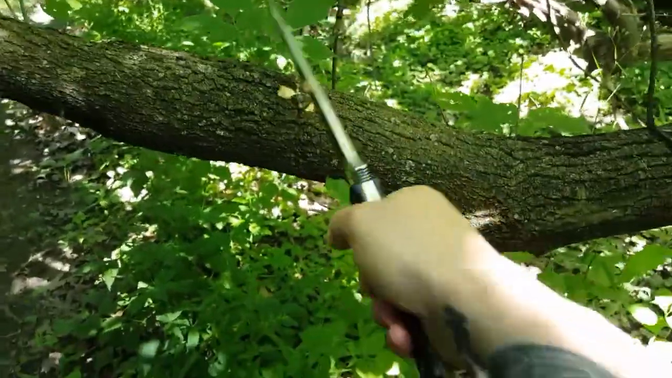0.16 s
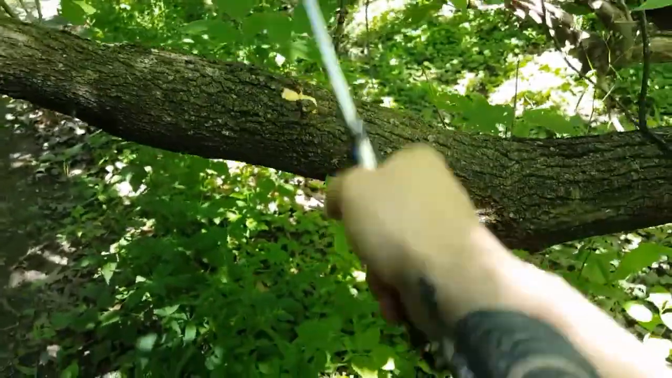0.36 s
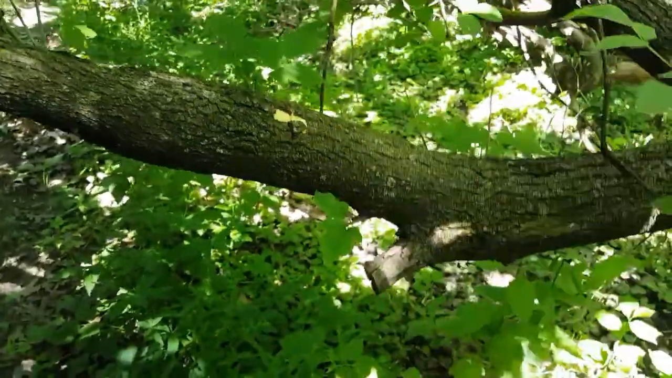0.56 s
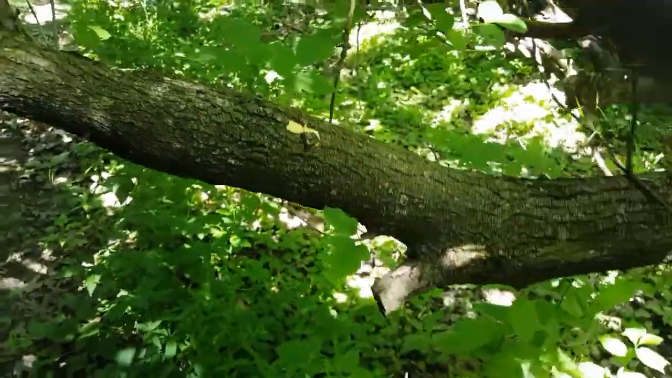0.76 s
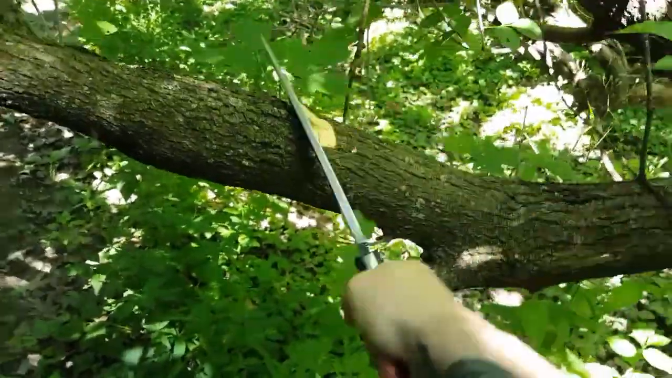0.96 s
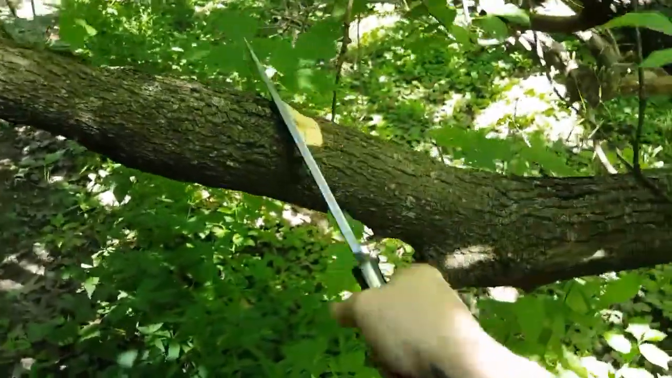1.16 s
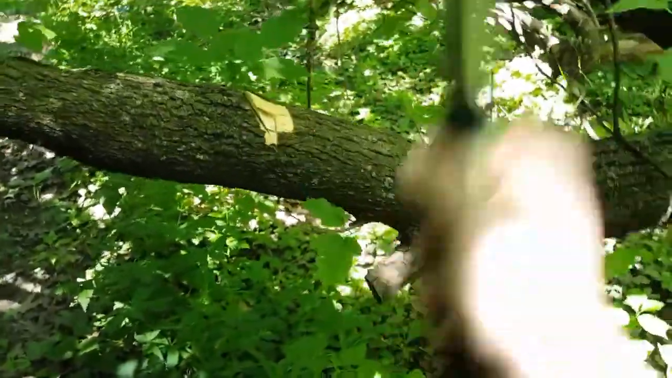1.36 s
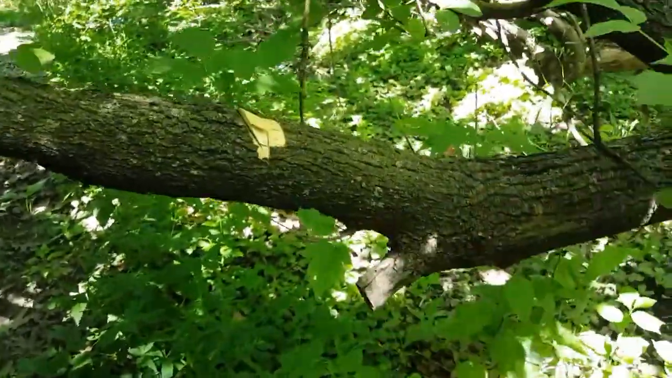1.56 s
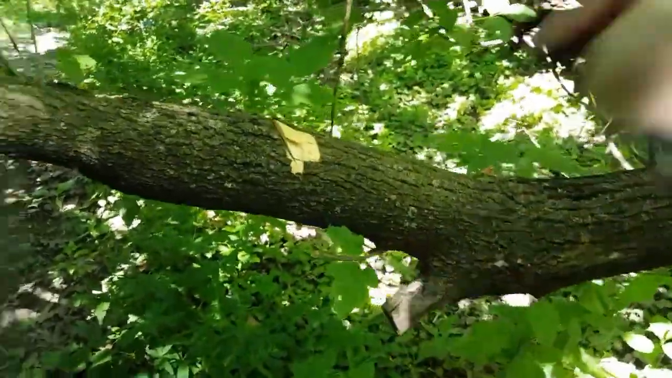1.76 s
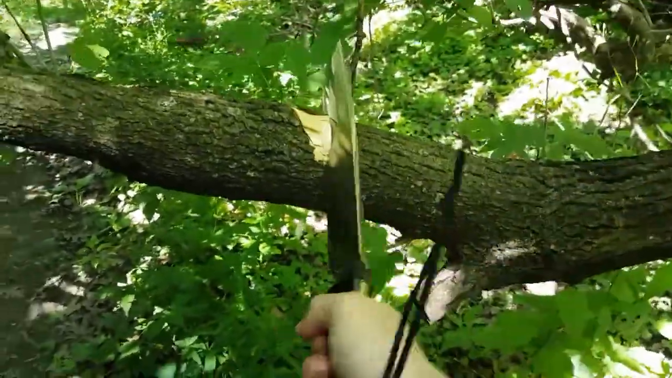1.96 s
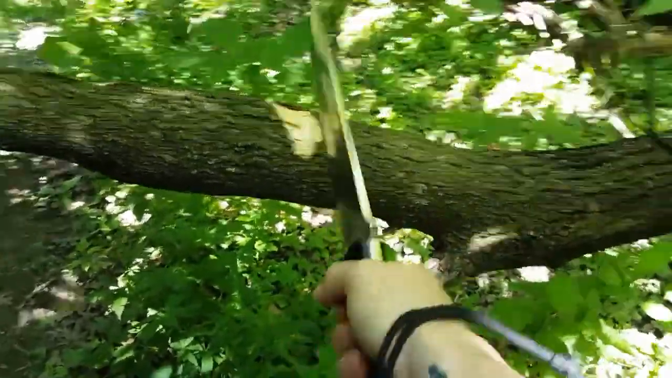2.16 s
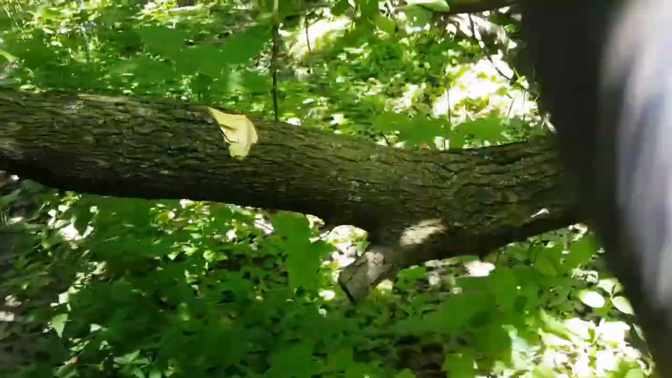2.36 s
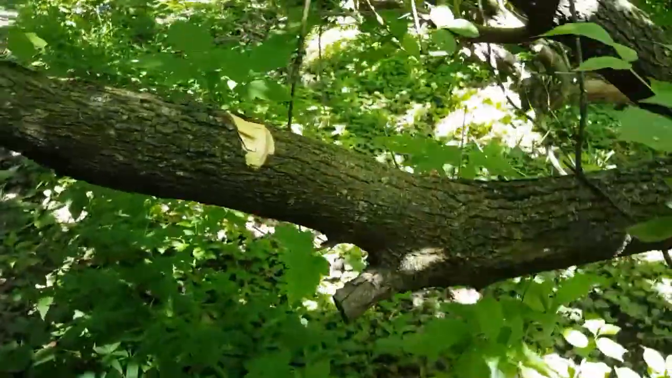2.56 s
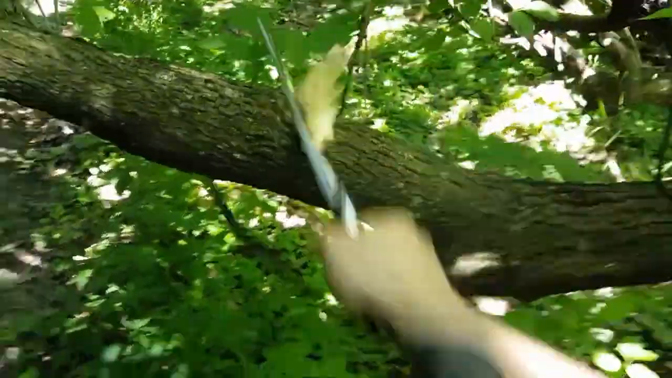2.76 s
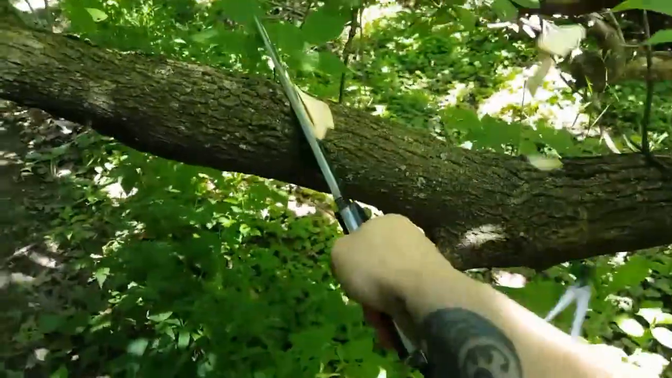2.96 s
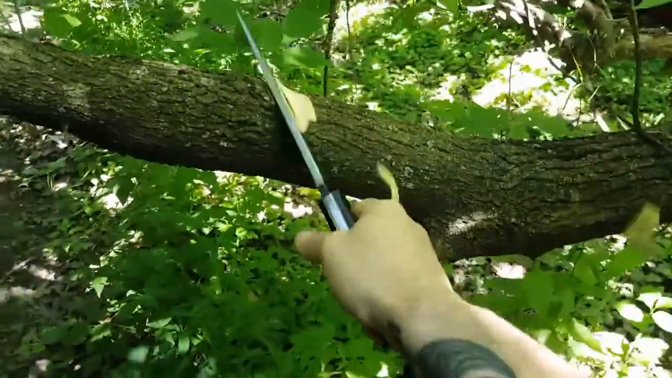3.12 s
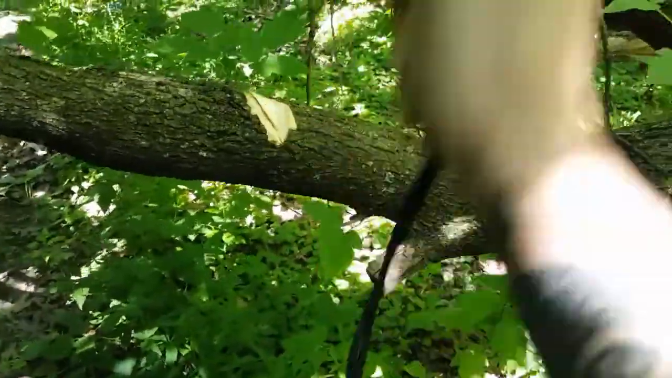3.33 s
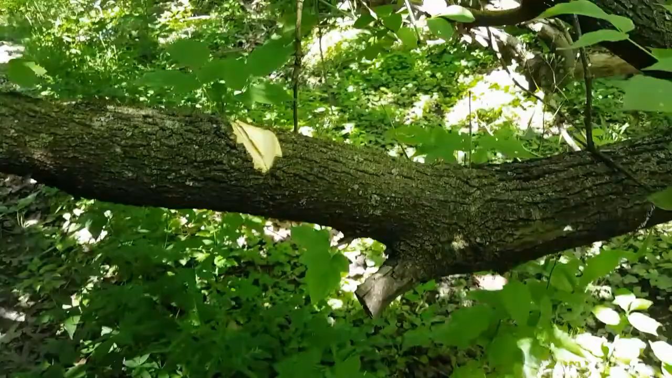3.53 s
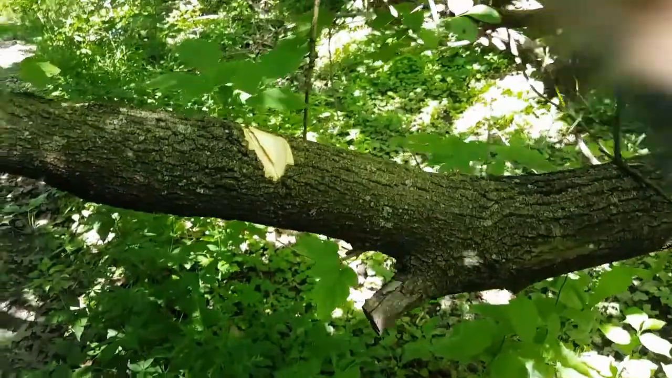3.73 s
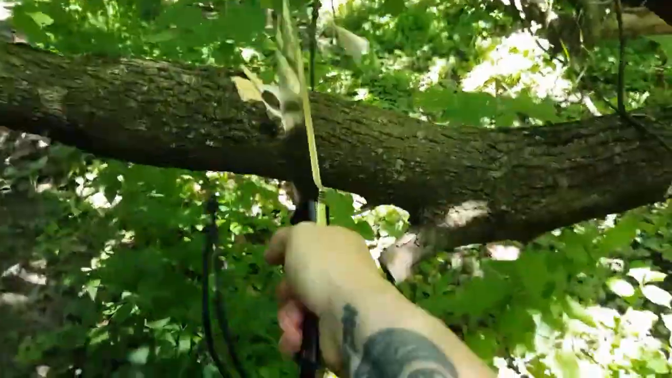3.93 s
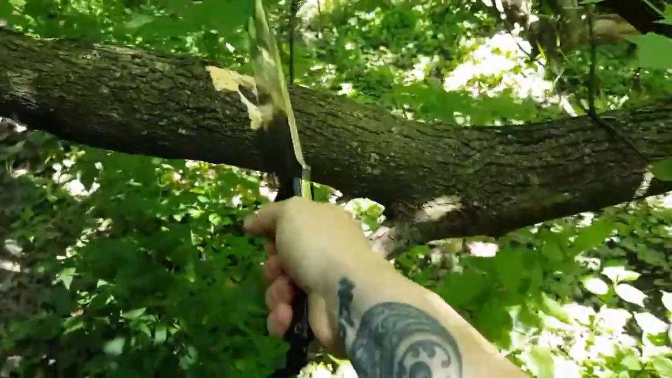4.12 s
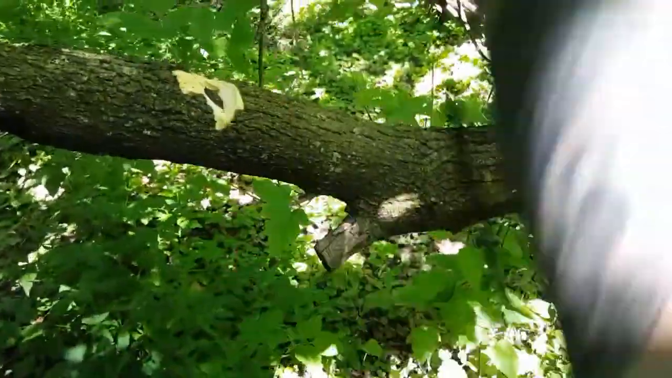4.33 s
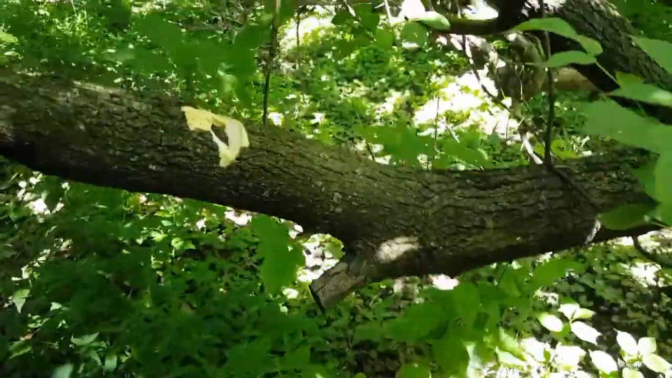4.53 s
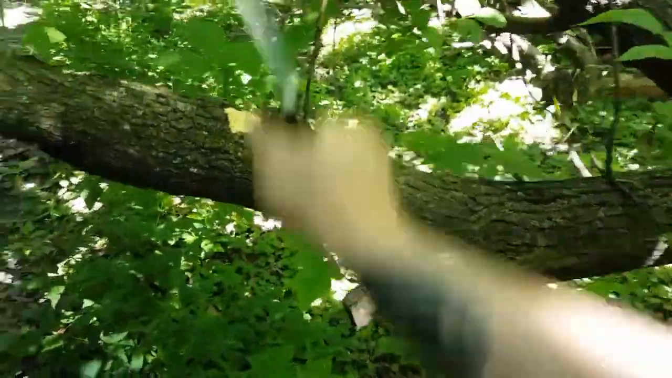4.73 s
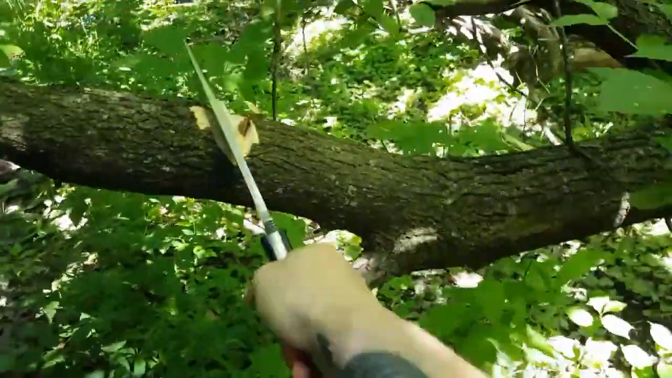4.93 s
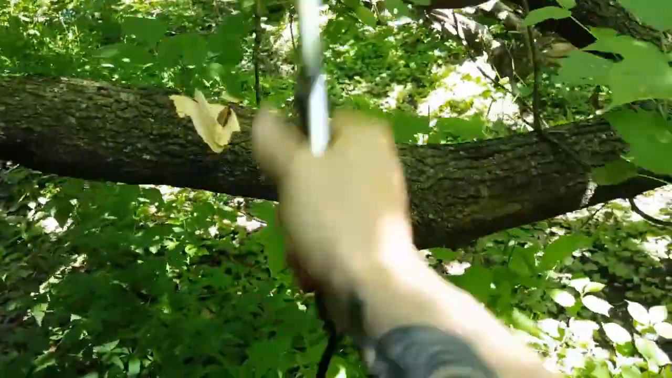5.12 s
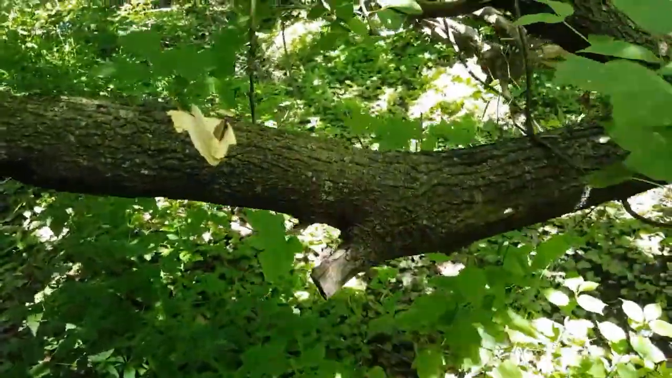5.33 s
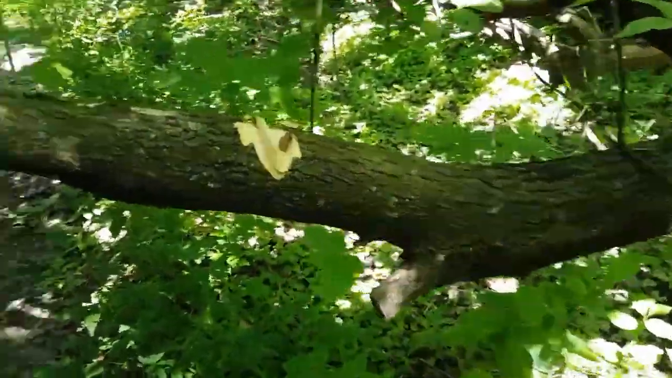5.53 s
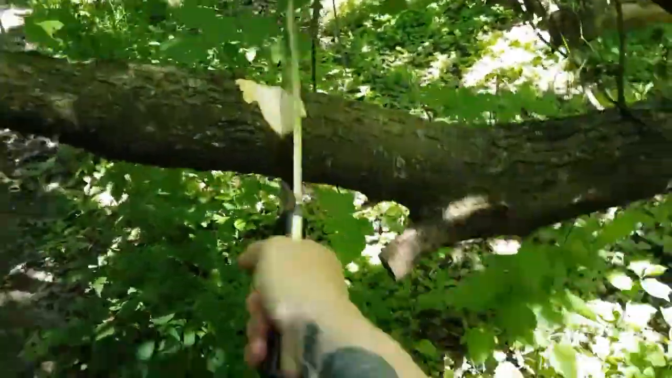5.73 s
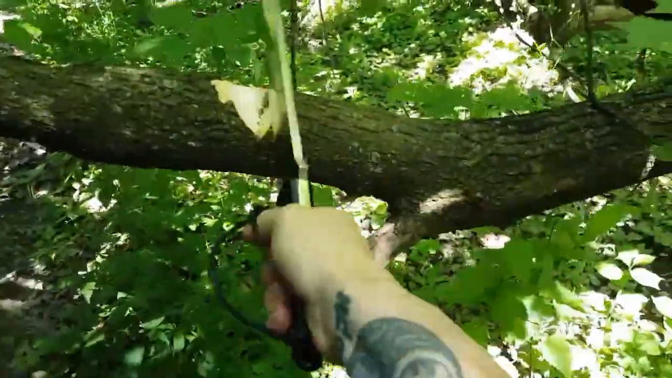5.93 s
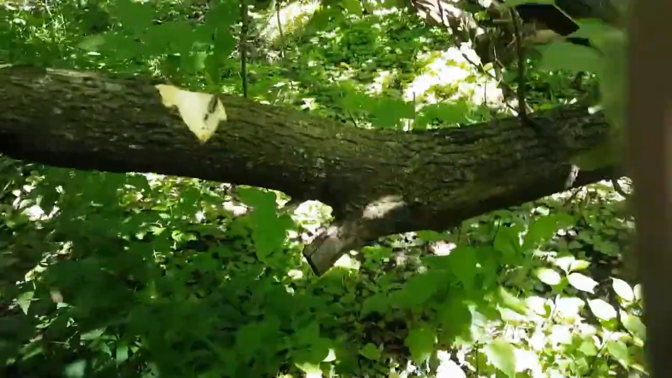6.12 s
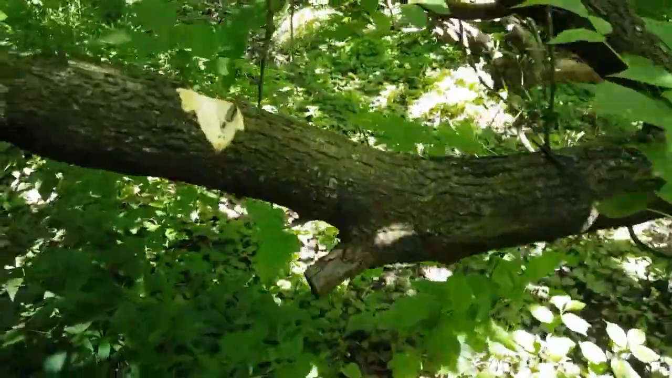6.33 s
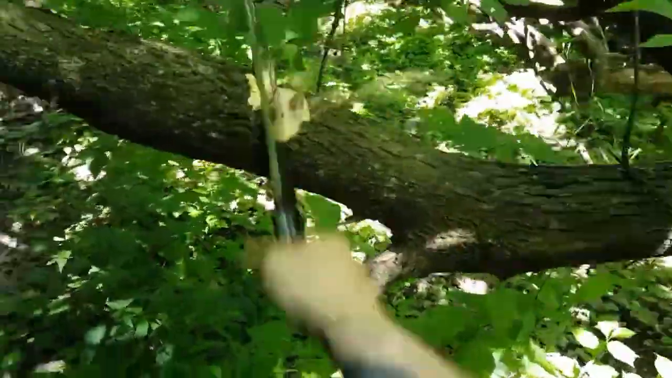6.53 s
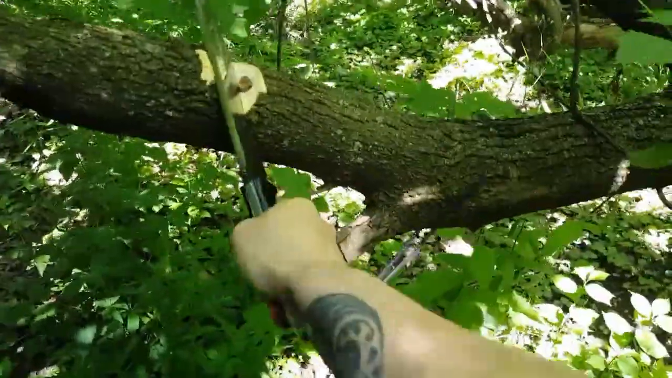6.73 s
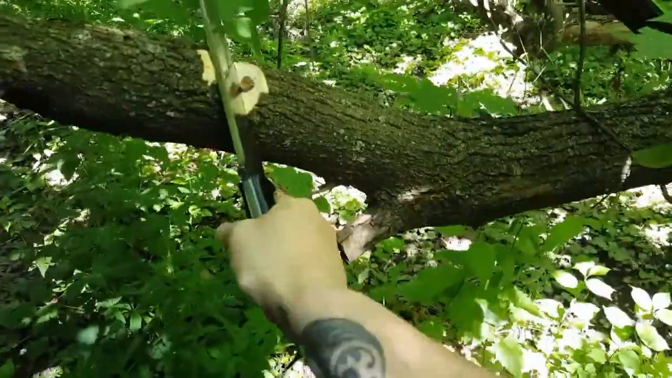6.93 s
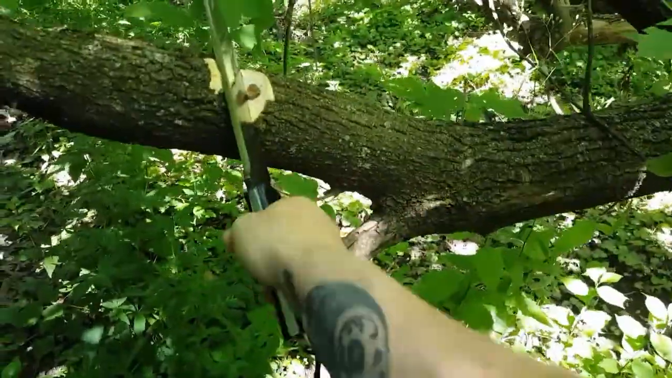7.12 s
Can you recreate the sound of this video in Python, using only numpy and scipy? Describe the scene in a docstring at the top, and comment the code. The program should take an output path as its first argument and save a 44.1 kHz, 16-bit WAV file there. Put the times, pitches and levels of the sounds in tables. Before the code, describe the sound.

Close, hard knife blows crack into solid wood roughly once a second, with small steel clinks, snapping chips, leaf rustle and distant bird pips.

```python
"""Chopping in a wood: a low hum, a thin whine, rumble, leaves and hiss (sines and filtered noise) lie behind.
The knife clinks now and then (damped steel modes) and chops seven times into a fallen branch, close by.
Each blow is a crack of splitting fibres (noise burst), the knock of the branch (modes), the answer of the trees.
Chips snap in the leaves (noise bursts); far birds call singly (gliding sines), later in a run of pips.
The recorder's gain control ducks at every blow, holds, and lets the background swell back."""
import sys
import numpy as np
from scipy.fft import rfft, irfft, next_fast_len
from scipy.io import wavfile
from scipy.ndimage import uniform_filter1d, minimum_filter1d, map_coordinates

SR = 44100
rng = np.random.default_rng(int(sys.argv[2]) if len(sys.argv) > 2 else 0)


def wav_out(sig):
    """Save sig, one row per channel (or a flat mono array), as 16-bit PCM at SR to the path in sys.argv[1]."""
    wavfile.write(sys.argv[1], SR, np.round(np.clip(np.atleast_2d(sig).T, -1, 1) * 32767).astype(np.int16))


N = 316638


def amp(db):
    """Level law: decibels to amplitude gain."""
    return 10 ** (np.asarray(db) / 20)


def unit(x):
    """Normalisation: x scaled to rms 1."""
    return x / np.sqrt(np.mean(x ** 2) + 1e-20)


def at_level(x, t, start, end, db):
    """Short-time level: x scaled so that its rms between start and end is db."""
    window = (t >= start) & (t < end)
    return x * amp(db) / np.sqrt(np.mean(x[:, window] ** 2) + 1e-20)


def pan(db):
    """Level difference between channels: left and right gains, db apart."""
    return amp([[db / 2], [-db / 2]])


def along(points, hz):
    """Spectral envelope: (f, value) points interpolated over log frequency."""
    f, v = np.transpose(points)
    return np.interp(np.log(hz + 1), np.log(f + 1), v)


def curves(rows):
    """Slow variation: each column after the time, interpolated to one value per sample."""
    s, *cols = np.transpose(rows)
    return [np.interp(np.arange(N) / SR, s, c) for c in cols]


def wobble(rate, size=32):
    """Random modulation: a smooth curve, rate knots a second, worked out every size samples."""
    at = np.arange(0, N + size, size)
    knots = rng.standard_normal(int(N * rate / SR) + 4)
    return np.interp(np.arange(N), at, map_coordinates(knots, [at * rate / SR]))


def coloured(x, gain_db):
    """Minimum-phase filtering: x through the causal filter whose gain is gain_db(f)."""
    m = 2 * next_fast_len(x.shape[-1] // 2 + 4096)
    cepstrum = irfft(np.log(amp(gain_db(np.fft.rfftfreq(m, 1 / SR))) + 1e-6))
    # folding the cepstrum onto positive times makes the response causal
    cepstrum[1:m // 2] *= 2
    cepstrum[m // 2 + 1:] = 0
    return irfft(rfft(x, m) * np.exp(rfft(cepstrum)), m)[..., :x.shape[-1]]


def bump(hz, centre_hz, width, db):
    """Resonance curve in dB; width is a share of its centre frequency."""
    return db / (1 + ((hz / centre_hz - 1) / width) ** 2)


def tilt(hz, body_db, treble_db):
    """Spectral balance: gain in dB of the hollow low range and of the treble."""
    body = body_db / (1 + (np.log2((hz + 1) / 400) / 0.91) ** 4)
    return body + treble_db / (1 + (3400 / (hz + 1)) ** 4)


def ripple(hz, spacing_hz, db):
    """Modal irregularity: random narrow resonances and notches, new at each call, deeper in the treble."""
    knots = np.clip(rng.standard_normal(int(SR / spacing_hz) + 4), -1.5, 1.5)
    return db * map_coordinates(knots, [hz / spacing_hz]) * hz / (hz + 1500)


def noise(size, split_hz):
    """Interchannel coherence: stereo noise, alike in both channels well below split_hz, unrelated well above."""
    mid, side = rfft(rng.standard_normal((2, size)))
    turn = np.pi / 4 / (1 + (split_hz / (np.fft.rfftfreq(size, 1 / SR) + 1)) ** 2)
    mid, side = mid * np.cos(turn), side * np.sin(turn)
    return irfft(np.array([mid + side, mid - side]), size)


def burst(envelope, split_hz):
    """Broadband transient: a dense run of impulses under an envelope, evenly spread in frequency."""
    x = noise(len(envelope), split_hz) * envelope
    for _ in range(3):
        z = rfft(x)
        flat = irfft(z / (abs(z) + 1e-9), len(envelope))
        x = flat * np.sqrt(envelope)
    return x


def ring(modes, t, scatter_db, spread):
    """Modal decay: damped modes at new strengths, the high ones differing in phase between the channels."""
    hz, db, t60 = np.transpose(modes)[:, :, None]
    db = db + scatter_db * rng.standard_normal(hz.shape)
    phase = rng.uniform(0, 2 * np.pi, hz.shape)
    phase = phase + np.minimum(spread * hz / 1000, 2) * rng.standard_normal((2,) + hz.shape)
    return np.sum(amp(db - 60 * t / t60) * np.sin(2 * np.pi * hz * t + phase), axis=1)


def add(track, s, x):
    """Superposition: mix x into the track at time s."""
    i = min(max(round(s * SR), 0), N)
    track[:, i:i + x.shape[1]] += x[:, :N - i]


# low wavering hum and high whine drifting: t/s, whine gain/dB, hum gain/dB
DRONE_DRIFT = [(0, 9, -54.5), (.85, 11.5, -51.5), (1.6, 12, -63.5), (2.9, 6.5, -56.5), (4.4, 2, -67),
               (5.3, -10, -67.5), (7.18, -8, -63.5)]
# partials of the whine: f/Hz, relative level/dB
WHINE_PARTIALS = [(5389, -83), (5792, -81), (6191, -79.5), (6589, -78.5), (6988, -74.5), (7391, -80.5),
                  (7590, -78), (7994, -82.5), (8193, -75.5), (8586, -80), (8985, -81.5), (9388, -81.5)]
# narrow noise band around the whine: f/Hz, relative level/dB
SHIMMER_SPECTRUM = [(4500, -40), (5800, -9), (7000, 0), (8300, -1), (9300, -14), (10500, -45)]


def drone():
    """Modulated partials: a low wavering hum, and a thin whine of flickering sines in a narrow shimmer."""
    t = np.arange(N) / SR
    whine_db, hum_db = curves(DRONE_DRIFT)
    whine = np.zeros((2, N))
    for hz, db in WHINE_PARTIALS:
        phase = 1.5 * wobble(45) + rng.uniform(0, 2 * np.pi, (2, 1))
        whine += amp(db - 1 + 4 * wobble(9)) * np.sin(2 * np.pi * hz * t + phase)
    band = unit(coloured(noise(N, split_hz=3000), lambda hz: along(SHIMMER_SPECTRUM, hz)))
    shimmer = amp(-77 + 1.5 * wobble(40)) * band
    hum = amp(-1.0 + 1.6 * wobble(6.7)) * np.sin(2 * np.pi * 107 * t + .7 * wobble(10))
    return amp(whine_db) * (whine + shimmer) + amp(hum_db) * hum


# the wood at rest, before the gain control
RUMBLE_DB, LEAVES_DB, HISS_DB = -57.5, -59, -65
# air and clothing stir on every downswing, centred shortly before the blow
SWING_LEAD_S, SWING_S, SWING_RUMBLE_DB, SWING_RUSTLE_DB = 0.034, 0.062, -56, -57
# the body shifts between blows: t/s, half length/s, rumble level/dB, rustle level/dB, hiss level/dB
BODY_SHIFTS = [(0.659, .2, -58, -63.5, -73), (1.55, .25, -61.5, -58, -59.5), (3.677, 0.17, -66.5, -65, -63),
               (4.557, .17, -43.5, -52, -52.5), (7.14, 0.25, -48, -57, -86)]
# foliage shakes after a blow and settles: t/s, leaves level/dB, hiss level/dB, settling/(dB/s)
FOLIAGE_SHAKES = [(3.9, -36, -46, 17.5), (6.62, -41.5, -47.5, 22)]
SHAKE_RISE_S = 0.059


def stir():
    """Addition of powers: gains of rumble, leaves, hiss from rest, swings, body shifts and shaken foliage."""
    t = np.arange(N) / SR
    swell = lambda s, half_length: np.exp(-((t - s) / half_length) ** 2)
    power = lambda levels_db: amp(levels_db)[:, None] ** 2
    total = power([RUMBLE_DB, LEAVES_DB, HISS_DB]) * np.ones(N)
    swings = sum(swell(blow[0] - SWING_LEAD_S, SWING_S) for blow in BLOWS)
    total[:2] += power([SWING_RUMBLE_DB, SWING_RUSTLE_DB]) * swings
    for s, half_length, *levels_db in BODY_SHIFTS:
        total += power(levels_db) * swell(s, half_length)
    for s, leaves_db, hiss_db, settling in FOLIAGE_SHAKES:
        age = np.maximum(t - s, 0)
        shake = (1 - np.exp(-age / SHAKE_RISE_S)) * amp(-settling * age)
        total[1:] += power([leaves_db, hiss_db]) * shake ** 2
    return np.sqrt(total)


# dry snap, shared by leaves, chips, splinters and the knife's tick: f/Hz, relative level/dB
SNAP_SPECTRUM = [(100, -14.5), (500, -5), (1300, -5.5), (2300, -2.5), (3500, -3.5), (5000, -7.5),
                 (8000, -2), (14500, -13)]


def tick(pitch):
    """Resonant impulse: one tiny snap of peak 1; pitch runs from 0 (dull) to 1 (bright)."""
    t = np.arange(2 ** 11) / SR
    ring_hz = 700 * 6 ** pitch
    colour = lambda hz: along(SNAP_SPECTRUM, hz) + tilt(hz, 0, -8) + bump(hz, ring_hz, width=0.042, db=14.5)
    x = coloured(noise(len(t), split_hz=770) * amp(-60 * t / 0.016), colour)
    return x / abs(x).max()


def rustle(per_second, db, count=12):
    """Random impulse process: ticks at random times and strengths from a handful of dry leaves."""
    out = np.zeros((2, N))
    leaves = [tick(pitch) for pitch in np.linspace(0, 1, count)]
    for when, size, which in rng.uniform(size=(int(per_second * N / SR), 3)):
        add(out, when * N / SR, amp(db - 14 * (1 - size ** 2)) * leaves[int(which * count)])
    return out


# low rumble of the wood: f/Hz, relative level/dB
RUMBLE_SPECTRUM = [(12, -49.5), (20, -16.5), (27, -17), (48, -10.5), (102, 0.5), (117, -1.5), (145, -8.5),
                   (300, -16.5), (390, -47), (660, -120)]
# stirring leaves: f/Hz, relative level/dB
LEAVES_SPECTRUM = [(120, -30.5), (200, -8.5), (296, -6.5), (369, -0.5), (545, -10), (597, -6), (918, -7),
                   (1240, -11.5), (2320, -7.5), (4500, -18), (5850, -52), (9900, -120)]
# fine hiss: f/Hz, relative level/dB
HISS_SPECTRUM = [(2350, -31), (4000, -6), (5020, -5), (5220, -4.5), (5860, -4), (7150, -2), (8300, -0.5),
                 (10000, -10.5), (14000, -7.5), (14800, -14.5), (15000, -16.5)]
RUMBLE_PAN_DB, LEAVES_PAN_DB, HISS_PAN_DB = 1, -1.3, 0.35


def forest():
    """Filtered random noise: low rumble, stirring leaves with their dry ticks, and a fine hiss."""
    rumble_gain, leaves_gain, hiss_gain = stir()
    rush = lambda spectrum, split_hz: unit(coloured(noise(N, split_hz), lambda hz: along(spectrum, hz)))
    rumble = amp(1.3 * wobble(16)) * rush(RUMBLE_SPECTRUM, split_hz=230)
    leaves = amp(.8 * wobble(25)) * rush(LEAVES_SPECTRUM, split_hz=620) + rustle(per_second=12, db=17)
    hiss = amp(.8 * wobble(65)) * rush(HISS_SPECTRUM, split_hz=3500)
    return (rumble_gain * pan(RUMBLE_PAN_DB) * rumble
            + leaves_gain * pan(LEAVES_PAN_DB) * leaves
            + hiss_gain * pan(HISS_PAN_DB) * hiss)


def pip(db, pitch_hz, length, rise=.07):
    """Frequency glide: one short note, rising by a share of its pitch."""
    progress = np.linspace(0, 1, int(max(length, .005) * SR))
    hz = pitch_hz * (1 + rise * (progress - .5))
    phase = 2 * np.pi * np.cumsum(hz) / SR + rng.uniform(0, 1, (2, 1))
    return amp(db) * np.sin(np.pi * progress) ** 2 * np.sin(phase)


# single far calls: t/s, level/dB, f/Hz, length/s
SINGLE_CALLS = [(2.275, -59.5, 2956, .04), (2.28, -58, 2330, .06), (2.341, -51.5, 1040, 0.054)]
# a far bird repeats one pip, slowing a little
PIP_START_S, PIP_GAP_S, PIP_SLOWING_S, PIP_HZ, PIP_S = 5.118, 0.17, 0.00045, 2360, 0.027
# strength of the pips: t/s, level/dB
PIP_STRENGTH = [(5.1, -53), (6.2, -59), (6.8, -44.5), (7.18, -48)]


def birds(count):
    """Tonal calls in near-periodic repetition: a few single calls, then a run of pips, from far away."""
    out = np.zeros((2, N))
    for s, db, pitch_hz, length in SINGLE_CALLS:
        add(out, s, pip(db, pitch_hz, length))
    for k in range(count):
        s = PIP_START_S + k * (PIP_GAP_S + k * PIP_SLOWING_S)
        add(out, s, pip(np.interp(s, *np.transpose(PIP_STRENGTH)), PIP_HZ, PIP_S))
    return out


# bark, chips and twigs snap; the row at 3.888 s is a soft, dull noise just ahead of the fourth blow:
# t/s, peak level/dB, treble gain/dB, envelope t60/s, ring f/Hz
CHIP_SNAPS = [(0.093, -36.5, 8, 0.0185, 2500), (.752, -40, -8, .04, 2570), (1.013, -16.5, -13, 0.034, 2600),
              (1.064, -20, -6.5, 0.022, 2420), (1.309, -33, -15, 0.16, 1588),
              (1.354, -28, -10, 0.028, 2050), (1.582, -24, 0.5, 0.095, 1724), (1.921, -2, -8, 0.019, 1500),
              (2.9617, -.5, -8.5, 0.012, 1460), (3.553, -24, -0.5, 0.2, 5880),
              (3.635, -31, -9.5, 0.0507, 2250), (3.888, -10, -23, 0.12, 1030),
              (4.231, -22.5, -19, 0.025, 2490), (4.463, -22.5, -4, 0.033, 1870),
              (4.529, -19.5, -13.5, 0.033, 3480), (4.681, -30, -36, .04, 1066),
              (4.727, -26, -18, 0.048, 2570), (4.958, -21, -2, .025, 1700), (5.679, -34, -10, 0.0223, 2003),
              (6.161, -36.5, -19.5, 0.0292, 2401), (6.26, -36.5, -10, 0.043, 2304),
              (6.44, -38, -27, 0.029, 996), (6.888, -32, -35, 0.11, 400), (6.919, -29, -1, 0.022, 2270)]


def chips():
    """Brittle fracture: dry snaps with short rings and faint scatter from foliage, and one soft, dull noise."""
    out, t = np.zeros((2, N)), np.arange(2 ** 13) / SR
    for s, db, treble_db, t60, ring_hz in CHIP_SNAPS:
        envelope = amp(-60 * t / t60) + amp(-38.5) * amp(-60 * t / .15)
        ring_db = 12 * min(1, t60 / .035)  # the shortest sounds ring less
        colour = lambda hz: (along(SNAP_SPECTRUM, hz) + tilt(hz, 0, treble_db)
                             + bump(hz, ring_hz, width=0.057, db=ring_db))
        snap = coloured(burst(envelope, split_hz=2100), colour)
        add(out, s, amp(db) * snap / abs(snap).max())
    return out


# the knife clinks in the hand: t/s, peak level/dB, two favoured rings f/Hz, tick over ring level/dB
KNIFE_CLINKS = [(0.2871, -19, 1152, 4160, 4), (.8998, -20, 3130, 3700, 3), (1.886, -18, 3147, 4720, 3),
                (4.7847, -21, 3700, 6800, 2)]
# modes of the steel: f/Hz, relative level/dB, t60/s
STEEL_MODES = [(1150, -27, .14), (2040, -5.5, .02), (3144, -18, .06), (3790, -7, .02), (4160, -15, .05),
               (4670, -15, 0.036), (6089, -14.5, .05), (6860, -10, .035), (7860, -14, .05)]


def clinks():
    """Modal excitation: a tick and a short ring of steel; the contact point favours two modes."""
    out, t = np.zeros((2, N)), np.arange(2 ** 13) / SR
    for s, db, *rings_hz, tick_db in KNIFE_CLINKS:
        favour = lambda hz: sum(bump(hz, ring_hz, width=.04, db=15) for ring_hz in rings_hz)
        modes = [(hz, level + favour(hz), t60) for hz, level, t60 in STEEL_MODES]
        contact = coloured(burst(amp(-60 * t / 0.047), split_hz=560), lambda hz: along(SNAP_SPECTRUM, hz))
        clink = unit(ring(modes, t, scatter_db=0.56, spread=.5)) + amp(tick_db) * unit(contact)
        clink = clink * (1 - np.exp(-t / .0006))
        add(out, s, amp(db) * clink / abs(clink).max())
    return out


# answer of the trees: f/Hz, relative level/dB
ECHO_SPECTRUM = [(30, -17.5), (90, -11.5), (200, -0.5), (330, 0.5), (520, 1.5), (750, -2), (2700, -6.5),
                 (4500, -13.5), (8000, -14), (10000, -19), (14500, -25.5)]


def echo(t, treble_db):
    """Multiple scattering: near foliage answers at once in uneven clumps, far trunks go on faintly."""
    decay = amp(-60 * t / .27) + amp(-24.5) * amp(-60 * t / 0.78)
    scatter = (1 - np.exp(-(t / 0.021) ** 2)) * decay
    clumps = amp(1.1 * wobble(200)[:len(t)])
    colour = lambda hz: along(ECHO_SPECTRUM, hz) + tilt(hz, 0, treble_db) + ripple(hz, spacing_hz=109.7, db=2)
    return coloured(noise(len(t), split_hz=240) * scatter * clumps, colour)


# modes of the branch: f/Hz, relative level/dB, t60/s
BRANCH_MODES = [(63, -18, 0.16), (164.5, -5, 0.13), (190, -11, 0.13), (284, -13.5, 0.15),
                (406.4, -4.5, .11), (492, -9.5, 0.12), (551, -6.5, 0.13), (761.5, -6, 0.094),
                (874, -8.5, 0.11), (1009.2, -5.5, 0.094), (1135, -11.5, 0.14), (1370, -12.5, .08),
                (1615, -18.5, .08), (1810, -14, .09), (1950, -14.5, 0.1), (2420, -15, .1),
                (2760, -16, 0.16)]
# noisy part of the knock: f/Hz, relative level/dB
KNOCK_SPECTRUM = [(25, -14), (60, -11.5), (105, -15.5), (170, -3.5), (400, 2), (950, -2), (1400, -8),
                  (2600, -11.5), (4200, -17), (8000, -18), (10000, -26.5), (14500, -26)]


def knock(t, delay, branch_hz, body_db, treble_db):
    """Bending waves: the knock swells as the wave runs along the branch, then its modes ring out."""
    swell = 1 / (1 + np.exp(-(t - delay) / .005))
    fade = amp(-60 * np.maximum(t - .022, 0) / 0.081)
    colour = lambda hz: (along(KNOCK_SPECTRUM, hz) + bump(hz, branch_hz, width=0.063, db=10.0)
                         + ripple(hz, spacing_hz=114.5, db=4))
    wood = coloured(burst(swell * fade, split_hz=480), colour)
    modes = ring(BRANCH_MODES, t, scatter_db=2.5, spread=2.1) * (1 - np.exp(-t / 0.02))
    return coloured(unit(wood) + amp(-1.5) * unit(modes), lambda hz: tilt(hz, body_db, treble_db))


# splitting fibres: f/Hz, relative level/dB
CRACK_SPECTRUM = [(25, -12.5), (70, -2.5), (250, -3), (500, -7), (1000, -1), (1700, -3), (2800, -4),
                  (3600, -11), (5500, -13.5), (7500, -9.5), (9500, -18.5), (14500, -20.5)]


def crack(t, bite, cut_modes, body_db, treble_db, thump_db):
    """Fracture noise: fibres split until the wood stops the blade; the cut rings briefly."""
    stop = amp(-60 * np.maximum(t - bite, 0) / 0.019)
    fibres = burst((1 - np.exp(-t / 0.00074)) * stop, split_hz=440)

    def colour(hz):
        """Resonance of the cut over the balance of the blow."""
        cut = sum(bump(hz, centre_hz, width=0.13, db=8) for centre_hz in cut_modes)
        thump = thump_db / (1 + (hz / 200) ** 4)
        balance = along(CRACK_SPECTRUM, hz) + tilt(hz, body_db, treble_db)
        return balance + thump + cut + ripple(hz, spacing_hz=252.6, db=2.5)
    return coloured(fibres, colour)


# blows, levels before the low shelves: t/s, bite length/s, crack level/dB, crack body gain/dB,
# crack treble gain/dB, thump gain/dB, three resonances of the cut f/Hz, knock level/dB, knock body gain/dB,
# knock treble gain/dB, knock delay/s, branch resonance f/Hz, echo level/dB, deep bass gain/dB, pan/dB
BLOWS = [(0.9458, 0.00388, -0.5, -1.5, 3.5, 2.5, 975.6, 2450, 3910, -14.5, -0.5, 3.5, .011, 820, -32.5, -6, 0.5),
         (1.926, 0.0049, 5.5, -2.5, 5, 3.5, 1024, 1467, 2462, -7.5, -0.5, 3.5, .006, 470, -33, 2, 1.33),
         (2.856, 0.0051, -6, 3, 4, 2, 1000, 1630, 2500, -22, 3, -1.5, .008, 894, -35.5, -3, 3.3),
         (3.894, .0065, 1, -3, -5.5, -9, 810, 1850, 2700, -3.5, -2.5, -6, .013, 407, -18, -14, -1.2),
         (4.8468, 0.0036, 3, 6, 4.5, -3, 432.7, 2216, 2960, -12, -7.5, 4, .012, 963, -31, .5, .3),
         (5.7284, 0.0043, 4.5, -1, -2, 4, 1394, 2784, 3665, -9.5, 4.5, -2.5, .016, 400, -32.5, .5, 2.5),
         (6.6118, 0.008, -13, 3, -3, 2.5, 595, 976, 2270, -17.5, 4.5, 2, .012, 380, -34.5, -5, 1.5)]


def chops():
    """Impact on a beam: the crack of the cut, the knock of the branch, the answer of the trees, splinters."""
    out, t = np.zeros((2, N)), np.arange(int(.55 * SR)) / SR
    for s, bite, *crack_row, knock_db, knock_body, knock_treble, delay, branch_hz, echo_db, bass_db, pan_db in BLOWS:
        crack_db, crack_body, crack_treble, thump_db, *cut_modes = crack_row
        split = crack(t, bite, cut_modes, crack_body, crack_treble, thump_db)
        split = at_level(split, t, 0, bite, crack_db)
        body = knock(t, delay, branch_hz, knock_body, knock_treble)
        body = at_level(body, t, 0.0055, .035, knock_db)
        body += at_level(echo(t, knock_treble), t, .06, 0.11, echo_db)
        body = coloured(body, lambda hz: thump_db / (1 + (hz / 115) ** 4))
        # deep bass gain below 70 Hz, set for each blow
        blow = coloured(split * pan(pan_db) + body, lambda hz: bass_db / (1 + (hz / 70) ** 4))
        add(out, s, blow)
        # splinters let go after the blow, the later the weaker
        for when, pitch in rng.uniform(size=(7, 2)):
            late = 0.022 + 0.16 * when
            add(out, s + late, amp(echo_db + 20 - 170 * late) * tick(.4 + .5 * pitch))
    return out


def scene():
    """Superposition: the wood's background, then the chopping in front of it."""
    return drone() + forest() + birds(count=14) + chips() + clinks() + chops()


# CUT_SHARE is the share of the excess level taken away
THRESHOLD_DB, CUT_SHARE, SENSE_S, HOLD_S, RELEASE_DB_PER_S = -24.5, 0.46, .03, .6, 24.5


def gain_control(x):
    """Compression: takes away a share of the level above threshold, holds that cut, then slowly lets go."""
    power = abs(uniform_filter1d(np.mean(x ** 2, axis=0), int(SENSE_S * SR)))
    cut_db = CUT_SHARE * np.maximum(10 * np.log10(power + 1e-12) - THRESHOLD_DB, 0)
    half = int(HOLD_S * SR / 2)
    # the largest cut of the past hold time
    held_db = -minimum_filter1d(-cut_db, 2 * half + 1, origin=half, mode="nearest")
    # a running maximum over a ramp lets the cut fall no faster than the release
    ramp_db = RELEASE_DB_PER_S * np.arange(N) / SR
    return x * amp(ramp_db - np.maximum.accumulate(held_db + ramp_db))


TOP_HZ = 14900


def record(dry):
    """Compression, clipping and band limiting: blows duck the gain, peaks clip, a steep low-pass ends the band."""
    m = next_fast_len(N + SR // 2)
    passed = 1 / (1 + (np.fft.rfftfreq(m, 1 / SR) / TOP_HZ) ** 120)
    clipped = np.clip(gain_control(dry), -1, 1)
    return irfft(rfft(clipped, m) * passed, m)[:, :N]


dry = scene()
out = record(dry)
wav_out(out)
```